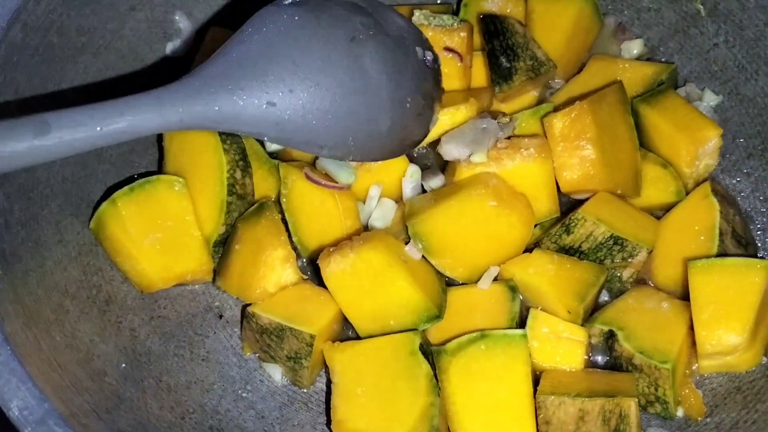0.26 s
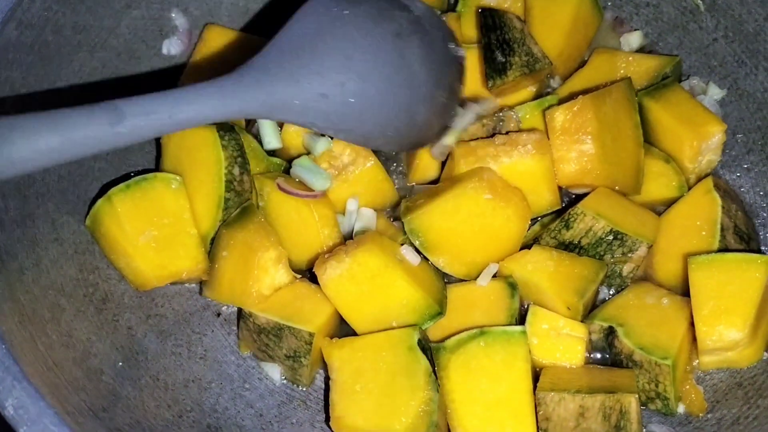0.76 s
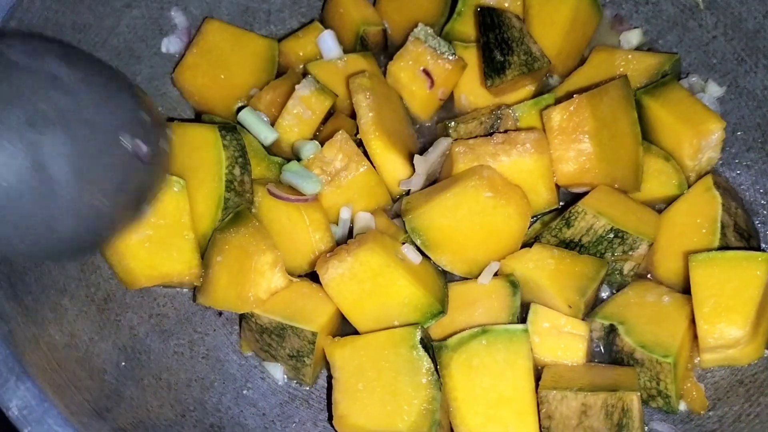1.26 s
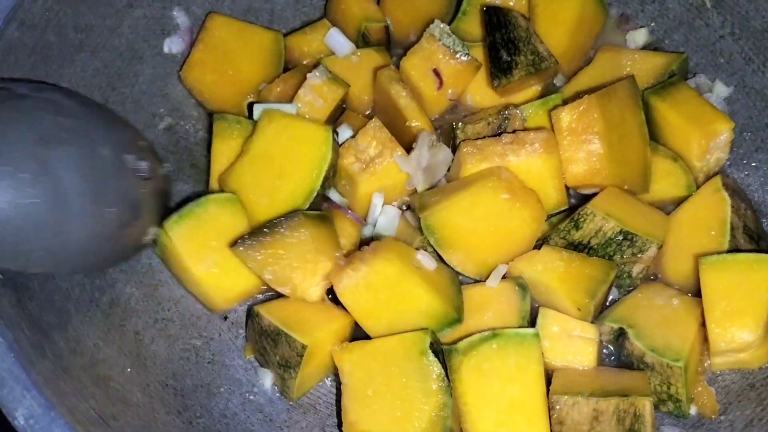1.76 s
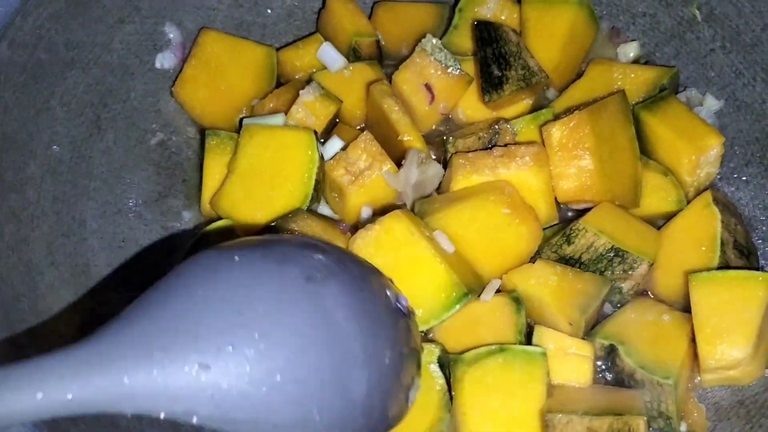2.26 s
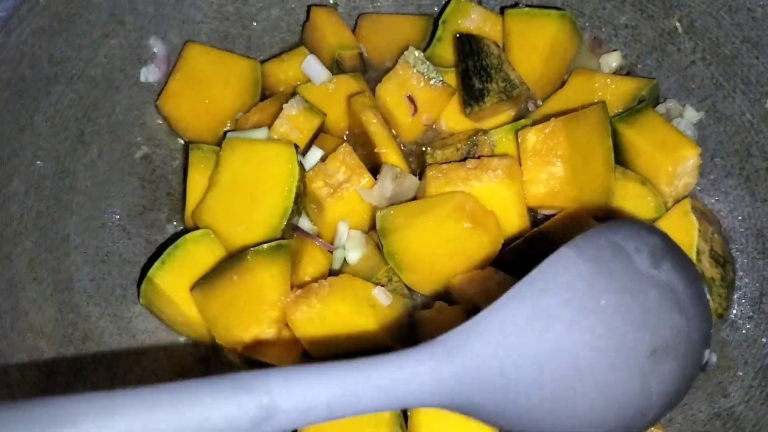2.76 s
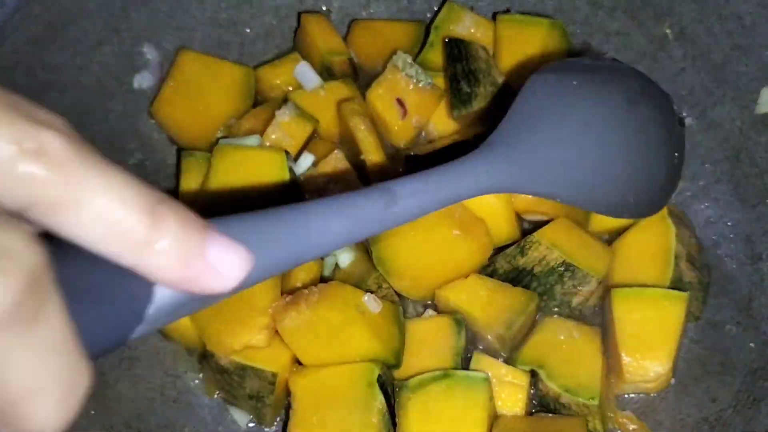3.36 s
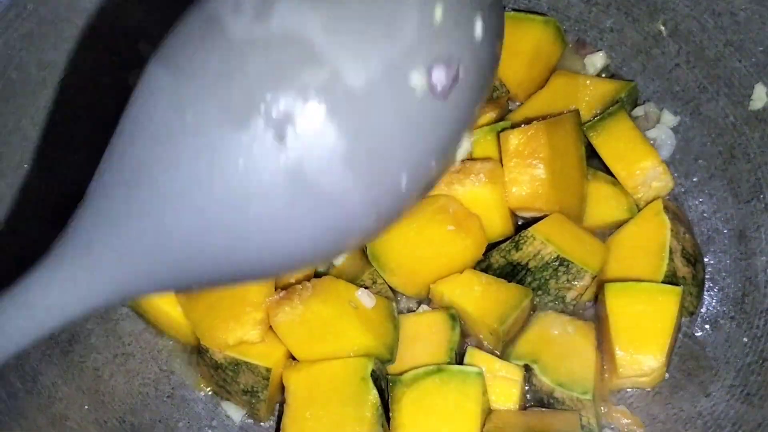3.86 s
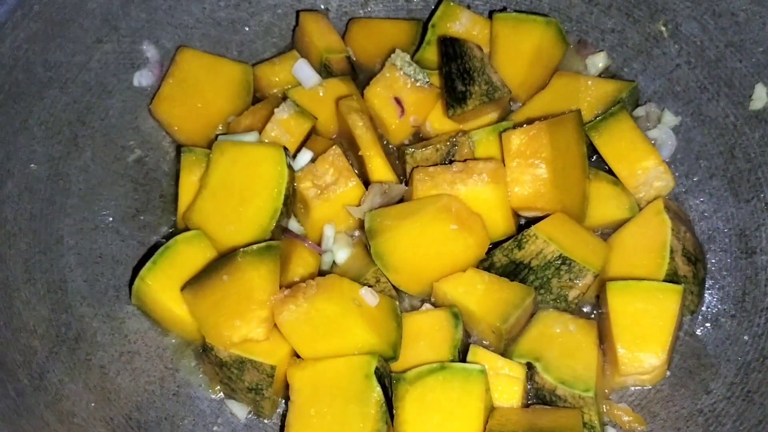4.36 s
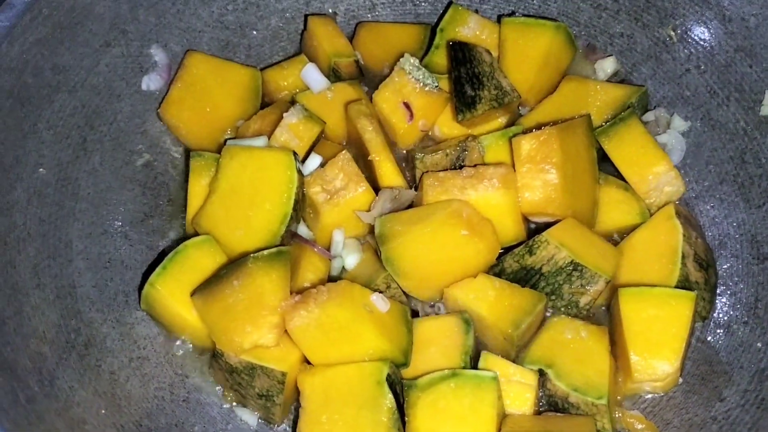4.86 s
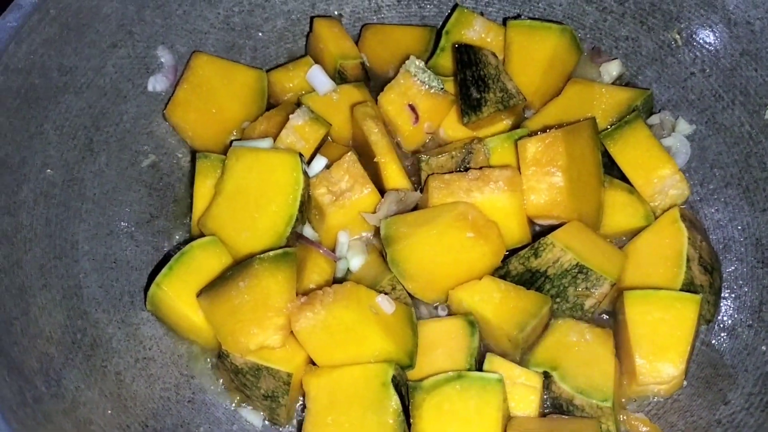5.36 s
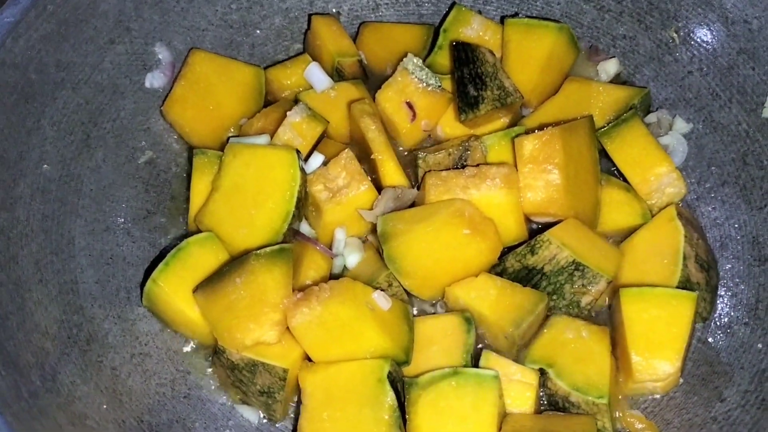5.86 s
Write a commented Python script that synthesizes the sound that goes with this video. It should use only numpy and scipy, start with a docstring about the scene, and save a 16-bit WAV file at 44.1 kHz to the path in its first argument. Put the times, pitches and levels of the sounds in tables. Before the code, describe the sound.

One rooster crow dominates: rough, stepping upward, sustained for about two seconds, then drooping, heard from outside with brief yard reflections. Near the microphone, soft bassy thumps come at the start, middle and end. A ladle swishes faintly and knocks a food-filled wok just after the crow. Beneath lie a barely audible sizzle, a thin electrical hum, a low distant drone and weak far-off bird calls.

```python
"""Rooster outside a kitchen

A rooster crows once in the yard: a hoarse start, a long held note, a falling end. It is built from
sliding overtones, rough growl and breath noise, with lower notes from a second voice and yard echoes.
Indoors a plastic ladle nudges pumpkin pieces in a wok: shaped noise makes light scrapes and a faint
sizzle, fading tones make one knock. Moving air and handling thump on the close microphone as rumble
and short swings. A motor hums in sine waves; a far bird and a low drone are narrow bands of noise."""
import sys
import numpy as np
from scipy import signal
from scipy.fft import rfft, irfft
from scipy.io import wavfile
from scipy.ndimage import uniform_filter1d

SR = 44100
rng = np.random.default_rng(int(sys.argv[2]) if len(sys.argv) > 2 else 0)


def store_pcm(level_fs):
    """Save levels as 16-bit WAV."""
    pcm = np.round(np.clip(level_fs, -1, 1) * 32767).astype(np.int16)
    wavfile.write(sys.argv[1], SR, np.atleast_2d(pcm).T)


N = 270333   # length in samples

CROW_START_S, CROW_END_S = 1.33, 3.345


def rooster():
    """Two voices of one bird sound together, inside a shared fade in and fade out."""
    t = seconds()
    fade_in = np.clip((t - CROW_START_S) / 0.0065, 0, 1)
    fade_out = np.clip((CROW_END_S - t) / 0.14, 0, 1)
    return fade_in * fade_out * (first_voice() + second_voice())


# The crow steps up, arches and sinks. Each row: time in seconds, pitch in Hz.
CROW_PITCH = [(1.36, 835), (1.44, 835.5), (1.55, 813.6), (1.58, 906.5), (1.63, 917), (1.72, 892.4),
              (1.83, 924.8), (1.96, 943.8), (2.1, 922.6), (2.22, 916.4), (2.46, 893.7), (2.56, 905.2),
              (2.72, 901.7), (2.95, 852.4), (3.1, 825.3), (3.22, 769.8), (3.3, 775)]
# How hard the bird pushes. Each row: time in seconds, effort in dB before the offsets below.
CROW_EFFORT = [(1.36, -38), (1.42, -34.5), (1.62, -33.5), (1.69, -38.5), (1.85, -29), (1.97, -30),
               (2.02, -33), (2.15, -29.5), (2.38, -31), (2.5, -32.5), (2.57, -28.5), (2.65, -28.5),
               (2.76, -33), (2.92, -42), (3.18, -40), (3.3, -38.5)]
# How the beak opens. Each row: time in seconds, frequency in Hz that sets the moving resonances.
BEAK_OPENING = [(1.35, 3560), (1.95, 3628), (2.47, 3556), (2.58, 3860), (2.87, 4214), (3.3, 4210)]
VOICE_DB = 1   # strong overtones, relative to effort


def first_voice(flutter=0.00211, entry_s=1.351, tension_s=0.031):
    """The syrinx (the bird's voice organ) gives a stack of overtones; when pressed it grows rough."""
    pitch = uniform_filter1d(in_time(CROW_PITCH)[0], int(tension_s * SR))   # muscle tension cannot jump
    effort_db, = in_time(CROW_EFFORT)
    opening_hz, = in_time(BEAK_OPENING)
    jitter, growl_gain, rasp_gain = hoarseness(effort_db)
    unsteady_pitch = pitch * (1 + jitter * drift(107.5) + flutter * drift(43.2))
    phase = 2 * np.pi * np.cumsum(unsteady_pitch) / SR
    voice = from_db(effort_db + VOICE_DB) * strong_partials(phase, pitch, opening_hz)
    voice += beak_tone(phase, pitch)
    voice += growl_gain * growl(phase) + rasp_gain * rasp(phase)
    return voice * np.clip((seconds() - entry_s) / 0.014, 0, 1)


# Spells in which the voice breaks up; they add to the clear values below.
# Each row: start and end in seconds, pitch jitter as a share, half-pitch growl in dB, rasp in dB.
ROUGH_SPELLS = [(1.343, 1.38, 0.0075, -72, -50), (1.464, 1.55, 0.0031, -61, -57),
                (1.57, 1.794, 0.0082, -65, -50.5), (2.055, 2.247, 0.0047, -48, -55.5),
                (2.259, 2.346, 0.0014, -47, -49), (2.475, 2.771, 0.0029, -45.5, -48.5),
                (3.208, 3.299, 0.008, -51, -53)]
CLEAR_JITTER = 0.0033   # share of the pitch
CLEAR_GROWL_DB, CLEAR_RASP_DB = -49, -46   # relative to effort
BREAK_S = 0.016   # time the voice takes to break or clear


def hoarseness(effort_db):
    """Jitter, growl and rasp follow a clear voice and rise in each hoarse spell."""
    jitter = CLEAR_JITTER
    growl_gain = from_db(effort_db + CLEAR_GROWL_DB)
    rasp_gain = from_db(effort_db + CLEAR_RASP_DB)
    for start, end, share, growl_db, rasp_db in ROUGH_SPELLS:
        on = spell(start, end, BREAK_S)
        jitter = jitter + share * on
        growl_gain = growl_gain + from_db(growl_db) * on
        rasp_gain = rasp_gain + from_db(rasp_db) * on
    return jitter, growl_gain, rasp_gain


# Fixed resonances that the five strong overtones slide through. Each row: frequency in Hz, gain in dB.
WINDPIPE_COLOUR = [(780, 6), (825, -14), (900, -7), (930, 0), (1550, -7), (1660, 0), (1900, 1), (2350, -22),
                   (2520, -10), (2710, -14), (2850, -24), (3130, -2), (3320, -6), (3450, -28), (4550, -46),
                   (4680, -27)]
# Two resonances move with the beak and jump up late in the held note.
# Each row: share of the opening frequency, peak gain in dB, width in Hz.
MOVING_RESONANCES = [(0.744, -11.5, 185), (1.002, -5.5, 309)]
# A wide-open beak weakens the lowest partial.
OPENING_HZ, WIDE_OPEN_HZ, OPEN_FUNDAMENTAL_DB = 3650, 3760, -2


def strong_partials(phase, pitch, opening_hz, shimmer=0.23, swell_db=2.5, count=5):
    """The lowest partials trade places as they cross resonances of windpipe and beak; rms about 1."""
    multiples = np.arange(1, count + 1)
    hz = multiples[:, None] * pitch
    gains = at_hz(WINDPIPE_COLOUR, hz)
    for share, db, width in MOVING_RESONANCES:
        offset = 2 * (hz - share * opening_hz) / width
        gains = gains + from_db(db) / (1 + offset ** 2) ** 2
    gains[0] *= from_db(np.interp(opening_hz, [OPENING_HZ, WIDE_OPEN_HZ], [0, OPEN_FUNDAMENTAL_DB]))
    total = 0
    for k, gain in zip(multiples, gains):
        wavering = (1 + shimmer * drift(32)) * from_db(swell_db * np.tanh(drift(12)))
        total = total + gain * np.sin(k * phase) * wavering
    return total / np.sqrt(np.sum(gains ** 2, axis=0) / 2)


# Colour of the higher overtones. Each row: frequency in Hz, gain in dB.
BEAK_COLOUR = [(4500, 4), (5500, -7.5), (5900, -9), (6400, 3), (6950, -21), (7500, 15.5), (8100, -1.5),
               (8350, -25), (9500, -24.5), (11700, -17), (14000, -23), (16000, -25)]
RING_DB = -70.5   # ring while the pitch is relaxed
STRAIN_FROM_HZ, STRAIN_FULL_HZ, STRAIN_DB = 894.7, 919.2, 21.5   # extra ring at full strain
SHEEN_DB, SHEEN_START_S, SHEEN_END_S = -71.5, 1.76, 3.16


def beak_tone(phase, pitch):
    """The beak rings louder as pitch is strained upward; a top sheen sounds through the long note."""
    strain = np.interp(pitch, [STRAIN_FROM_HZ, STRAIN_FULL_HZ], [0, 1])
    ring = from_db(RING_DB + STRAIN_DB * strain) * stack(phase, pitch, np.arange(6, 11), BEAK_COLOUR)
    sheen_gain = from_db(SHEEN_DB) * spell(SHEEN_START_S, SHEEN_END_S, BREAK_S)
    return ring + sheen_gain * stack(phase, pitch, np.arange(11, 20), BEAK_COLOUR)


# Lines halfway between the overtones. Each row: multiple of the pitch, level in dB.
GROWL_LINES = [(1.5, -7.5), (2.5, 0), (3.5, 1.5), (4.5, -19)]


def growl(phase, phase_jitter=0.1):
    """Alternate cycles differ, unsteadily, which puts lines halfway between the partials; rms 1."""
    total = 0
    for k, db in GROWL_LINES:
        line = np.sin(k * phase + phase_jitter * drift(180))
        total = total + from_db(db) * line * (1 + 0.45 * drift(75))
    return rms_one(total)


# Colour of the throat. Each row: frequency in Hz, gain in dB.
THROAT_COLOUR = [(520, -36), (660, -4), (780, -12.5), (950, -15), (1100, -26), (1330, -5.5), (1520, -27),
                 (1800, -2), (2150, -12), (2650, -4), (3250, -2), (3700, -14), (4200, -20.5), (6000, -30)]


def rasp(phase, bursts_db=9.5):
    """Air escapes in a puff each cycle, in uneven bursts, and rings the throat; rms 1."""
    puffs = rng.standard_normal(N) * (1 + np.cos(phase))
    return coloured(puffs * from_db(bursts_db * np.tanh(drift(80))), THROAT_COLOUR)


# The other side of the syrinx adds lower notes at the start and end.
# Each row: start and end in seconds, pitch in Hz before scoop and sag, then levels in dB of
# the first partial, the overtones and the half-pitch growl.
SECOND_VOICE_NOTES = [(1.338, 1.443, 762, -44, -64, -87), (1.483, 1.604, 668, -52.5, -42, -72),
                      (1.60, 1.664, 815, -43, -45, -77), (1.675, 1.771, 812, -43.5, -46, -49),
                      (1.776, 1.864, 799, -49.5, -70, -75), (3.199, 3.333, 728.6, -42, -53.5, -64)]
SCOOP_HZ, SCOOP_S, SAG_HZ_PER_S = 60.2, 0.022, 50   # each note scoops up, and sags as it goes


def second_voice(jitter=0.009, shimmer=0.084, fade_s=0.016):
    """Lower, unsteady notes beat against the first voice and make the crow hoarse."""
    pitch, first, upper, rough = SECOND_VOICE_NOTES[0][2], 0, 0, 0
    for start, end, hz, first_db, upper_db, growl_db in SECOND_VOICE_NOTES:
        age = np.maximum(seconds() - start, 0)
        on = spell(start, end, fade_s)
        scoop = SCOOP_HZ * np.exp(-age / SCOOP_S)
        sag = SAG_HZ_PER_S * np.minimum(age, end - start)
        pitch = np.where(age > 0, hz - scoop - sag, pitch)
        first = first + from_db(first_db) * on
        upper = upper + from_db(upper_db) * on
        rough = rough + from_db(growl_db) * on
    phase = 2 * np.pi * np.cumsum(pitch * (1 + jitter * drift(92.6))) / SR
    voice = np.sqrt(2) * first * np.sin(phase + 0.5 * drift(46))
    voice += upper * stack(phase, pitch, np.arange(2, 6), THROAT_COLOUR)
    voice += rough * (np.sin(1.5 * phase) + np.sin(2.5 * phase))
    return voice * (1 + shimmer * drift(92))


YARD_T60_S = 0.31   # time for the echoes to fall by 60 dB
YARD_DB, DIRECT_DB = -1.5, -4   # echoes and direct sound


def yard(x, first_echo_s=0.012):
    """Walls return a dense tail of echoes, made here of fading noise."""
    t = np.arange(SR) / SR
    echoes = rng.standard_normal(SR) * from_db(-60 * t / YARD_T60_S) * (t > first_echo_s)
    tail = signal.fftconvolve(x, echoes / np.linalg.norm(echoes))[:N]
    return from_db(DIRECT_DB) * x + from_db(YARD_DB) * tail


# Touches of the ladle. Each row: peak time in seconds, level in dB, rise and decay in seconds,
# then the shares in dB of dull wok body and of wet swish.
LADLE_TOUCHES = [(1.469, -46.5, 0.0059, 0.0083, -30, 2), (1.485, -61, .008, 0.058, -26, 3.5),
                 (2.485, -53, 0.0024, 0.029, -6, -7), (3.416, -45, 0.0019, 0.048, -1.5, -13),
                 (5.13, -68, 0.016, 0.022, 5, -15)]
# Colour of the wok body. Each row: frequency in Hz, gain in dB.
WOK_COLOUR = [(300, -7), (700, -1.5), (1200, -1.5), (2000, -11), (3000, -24), (3950, -4), (4600, -10),
              (5800, -2), (7000, -7.5), (8500, -29), (12000, -27.5), (16000, -27)]
# Colour of the wet swish. Each row: frequency in Hz, gain in dB.
SWISH_COLOUR = [(4000, -28), (5400, -6.5), (6900, 8), (8500, -14.5), (10000, -12), (12000, -1), (15000, 0),
                (16000, -10)]


def ladle(grain_db=1.0):
    """Each touch is a rush of tiny slips: the food-damped wok answers dully, the wet surface swishes."""
    body, swish = noise(WOK_COLOUR), noise(SWISH_COLOUR)
    touches = 0
    for s, db, rise, decay, body_db, swish_db in LADLE_TOUCHES:
        mix = from_db(body_db) * body + from_db(swish_db) * swish
        touches = touches + stroke(s, rise, decay) * from_db(db) * mix
    return touches * from_db(grain_db * drift(300))


# Ringing tones of the wok. Each row: frequency in Hz, level in dB relative to the knock,
# time in seconds to fall by 60 dB.
WOK_TONES = [(640, -5, .14), (770, 8.5, 0.068), (1034, -2, 0.091), (1228, -15, .13), (1810, -13, 0.16),
             (3900, -8, .13), (5640, -10, 0.18), (6300, -16, .1), (7050, -14, 0.15)]
KNOCK_S, KNOCK_DB, CRACK_DB = 3.4095, -46.5, -53


def knock(crack_decay_s=0.008):
    """The ladle knocks the wok wall: a brief crack sets it ringing; the food damps it quickly."""
    age = np.maximum(seconds() - KNOCK_S, 0)
    ring = 0
    for hz, db, t60 in WOK_TONES:
        fading = from_db(np.maximum(db - 60 * age / t60, -200))
        ring = ring + fading * np.sin(2 * np.pi * hz * age)
    crack = stroke(KNOCK_S, 0.0003, crack_decay_s) * noise(WOK_COLOUR)
    return from_db(KNOCK_DB) * ring + from_db(CRACK_DB) * crack


# Spells of hiss, added to the resting hiss. Each row: start and end in seconds, level in dB.
HISS_SPELLS = [(1.15, 4.0, -81), (5.12, 5.72, -87)]
# Colour of the hiss. Each row: frequency in Hz, gain in dB.
HISS_COLOUR = [(5000, -16.5), (7000, 8.5), (9500, -15), (11700, 0), (12800, -4), (15500, 2)]
# Spits of juice on hot metal. Each row: peak time in seconds, level in dB, rise and decay in seconds.
JUICE_SPITS = [(4.205, -64, 0.043, 0.039), (4.218, -59.5, 0.0036, .006)]
# Colour of the spits. Each row: frequency in Hz, gain in dB.
SPIT_COLOUR = [(5000, -30), (7200, -7.5), (9000, -27), (12000, -11), (15000, -3), (16000, -2)]
HISS_REST_DB, HISS_FADE_S = -85, 0.1


def sizzle(grain_db=2.0):
    """Juice hisses faintly on the metal and spits now and then."""
    hiss = from_db(HISS_REST_DB)
    for start, end, db in HISS_SPELLS:
        hiss = hiss + from_db(db) * spell(start, end, HISS_FADE_S)
    both = swells(JUICE_SPITS) * noise(SPIT_COLOUR) + hiss * noise(HISS_COLOUR)
    return both * from_db(grain_db * drift(250))


# Gusts of air at the microphone.
# Each row: peak time in seconds, level in dB, rise and decay in seconds.
AIR_GUSTS = [(.14, -29, 0.032, 0.11), (.97, -44, 0.096, .3), (1.92, -42, 0.046, 0.065),
             (2.22, -46, 0.054, 0.086), (2.52, -46.5, 0.053, .1), (2.82, -46, 0.066, 0.094),
             (3.62, -47, 0.21, 0.09), (4.1, -48, 0.15, 0.15), (5.05, -38.5, .065, 0.096),
             (5.82, -51, 0.05, 0.088)]
# Colour of the rumble. Each row: frequency in Hz, gain in dB.
GUST_COLOUR = [(20, -11), (35, -1), (55, 1), (90, -2), (130, -11.5), (200, -21.5), (300, -25.5),
               (500, -44.5)]
# The strongest thumps. Each row: time in seconds, level of the main swing in dB, frequency in Hz.
MICROPHONE_THUMPS = [(.110, -18, 89.5), (0.147, -22.5, 61), (0.169, -16, 140), (0.264, -28, 109),
                     (0.324, -34.5, 137), (0.489, -32.5, 111), (.899, -35.5, 108), (0.942, -26.5, 86),
                     (0.969, -39.5, 148), (1.028, -31.5, 93), (1.097, -31.5, 97), (1.271, -39.5, 88.5),
                     (1.52, -42, 96.5), (1.943, -26, 117), (1.982, -26.5, 63), (2.248, -36, 75),
                     (2.538, -37, 97.4), (2.795, -31.5, 106), (2.82, -23, 72), (3.631, -25.5, 68.6),
                     (3.718, -19, 78), (3.735, -23, 79), (3.975, -29.5, 58), (5.021, -17, 97),
                     (5.039, -19.5, 80), (5.177, -32.5, 56.6), (5.808, -39, 86), (5.88, -38.5, 66)]
CALM_DB = -59   # rumble between gusts
SNAP_DB, SNAP_RATIO = -18.5, 2.13   # a faster swing sharpens each thump: level and speed relative to it


def buffeting(cycles=0.5, lumpy_db=3.0):
    """Each thump pushes the diaphragm through one swing and back, over the lumpy rumble of gusts."""
    lumps = from_db(lumpy_db * np.tanh(drift(4)))
    out = (from_db(CALM_DB) + swells(AIR_GUSTS)) * lumps * noise(GUST_COLOUR)
    for s, db, hz in MICROPHONE_THUMPS:
        turns = (seconds() - s) * hz
        near = np.abs(turns) < 3
        snap = from_db(SNAP_DB) * swing(SNAP_RATIO * turns[near], cycles)
        out[near] -= from_db(db) * (swing(turns[near], cycles) + snap)
    return out


# Tones of the motor hum. Each row: whole multiple of the motor frequency, rms level in dB.
MOTOR_TONES = [(2, -72.5), (3, -77), (5, -73), (6, -75.5), (7, -77), (9, -74.5), (10, -80), (11, -75.5),
               (12, -69.5), (13, -85), (15, -77), (21, -81), (25, -84.5), (33, -81.5), (35, -80.5),
               (37, -82.5)]
# Colour of the room air. Each row: frequency in Hz, gain in dB.
AIR_COLOUR = [(110, -41.5), (180, -1), (201, -18), (243, -12.5), (316, -7), (533, -8), (564, -6),
              (596, -10), (760, -11.5), (1460, -9.5), (1640, -12.5), (4090, -17), (7310, -25.5),
              (9330, -43), (15800, -49.5)]
MOTOR_HZ, AIR_DB = 119.7, -63.36


def kitchen(waver=0.013):
    """Steady room air, and a motor buzz of sine waves that waver together."""
    turns = MOTOR_HZ * seconds() + waver * drift(2.93)
    hum = 0
    for k, db in MOTOR_TONES:
        hum = hum + np.sqrt(2) * from_db(db) * np.sin(2 * np.pi * (k * turns + rng.random()))
    return hum + from_db(AIR_DB) * noise(AIR_COLOUR)


# A bird far away. Each row: peak time in seconds, level in dB, rise and decay in seconds.
FAR_BIRD_CALLS = [(3.529, -66, 0.036, 0.057), (3.88, -69, 0.12, .15), (4.47, -66.5, .09, 0.1),
                  (5.22, -71.5, .06, 0.057), (5.62, -73, .12, .12)]
FAR_HZ, FAR_WIDTH_HZ = 2570, 160
DRONE_HZ, DRONE_WIDTH_HZ = 256, 43.4
# The drone outside swells once and fades.
DRONE_PEAK_S, DRONE_RISE_S, DRONE_DECAY_S = 2.45, 1, 0.29
DRONE_SWELL_DB, DRONE_REST_DB = -58.5, -79   # the swell adds to the resting level


def distance():
    """Faint calls of a far bird and a low drone, blurred on their way into narrow bands of noise."""
    swell = from_db(DRONE_SWELL_DB) * stroke(DRONE_PEAK_S, DRONE_RISE_S, DRONE_DECAY_S)
    drone = (from_db(DRONE_REST_DB) + swell) * narrow_noise(DRONE_HZ, DRONE_WIDTH_HZ)
    return swells(FAR_BIRD_CALLS) * narrow_noise(FAR_HZ, FAR_WIDTH_HZ) + drone


def from_db(db):
    """Decibels to gain."""
    return 10 ** (np.asarray(db) / 20)


def rms_one(x):
    """Scale to rms 1 (rms is the average strength)."""
    return x / np.sqrt(np.mean(x ** 2) + 1e-20)


def seconds():
    """Time of every sample."""
    return np.arange(N) / SR


def in_time(rows):
    """Each column of a curve, sample by sample."""
    s, *columns = np.transpose(rows)
    return [np.interp(seconds(), s, c) for c in columns]


def at_hz(points, hz):
    """Gain of a spectrum at given frequencies."""
    f, db = np.transpose(points)
    return from_db(np.interp(np.log(hz + 1), np.log(f), db))


def stack(phase, pitch, multiples, spectrum, uneven_db=6.0):
    """Partials slide through fixed resonances, each wavering by itself; total rms about 1 throughout."""
    gains = np.array([at_hz(spectrum, k * pitch) * from_db(uneven_db * drift(27)) for k in multiples])
    total = sum(g * np.sin(k * phase) for k, g in zip(multiples, gains))
    return total / np.sqrt(np.sum(gains ** 2, axis=0) / 2)


def coloured(x, spectrum):
    """Give a sound a colour that falls away beyond its ends; rms 1."""
    hz = np.fft.rfftfreq(N, 1 / SR) + 1
    low_end = 1 / (1 + (spectrum[0][0] / hz) ** 8)
    high_end = 1 / (1 + (hz / spectrum[-1][0]) ** 60)
    return rms_one(irfft(rfft(x) * at_hz(spectrum, hz) * low_end * high_end, N))


def noise(spectrum):
    """Noise of a given colour; rms 1."""
    return coloured(rng.standard_normal(N), spectrum)


def narrow_noise(hz, width_hz):
    """Noise in one narrow band; rms 1."""
    edges = [hz - width_hz / 2, hz + width_hz / 2]
    band = signal.butter(2, edges, "band", fs=SR, output="sos")
    return rms_one(signal.sosfilt(band, rng.standard_normal(N)))


def drift(rate_hz):
    """Random wander, mostly slower than a given rate, drawn at every tenth sample; rms about 1."""
    smooth = signal.butter(2, rate_hz, fs=SR / 10, output="sos")
    slow = signal.sosfilt(smooth, rng.standard_normal((N + SR) // 10 + 1))[SR // 10:]   # skip the start-up
    return np.interp(np.arange(N) / 10, np.arange(len(slow)), rms_one(slow))


def stroke(s, rise, decay):
    """Envelope that swells to 1 at s and dies away."""
    t = seconds() - s
    return np.exp(np.maximum(np.minimum(t / rise, -t / decay), -40))


def swells(rows):
    """Summed envelope of events given as peak time (s), level (dB), rise (s) and decay (s)."""
    return sum(from_db(db) * stroke(s, rise, decay) for s, db, rise, decay in rows)


def spell(start, end, fade):
    """Envelope that fades in around start, holds at 1 and fades out around end."""
    t = seconds()
    return np.clip(np.minimum(t - start, end - t) / fade + 0.5, 0, 1)


def swing(turns, cycles):
    """A cosine that lasts about the given number of cycles each way."""
    return np.cos(2 * np.pi * turns) * np.exp(-(turns / cycles) ** 2)


def scene():
    """All sources at one microphone."""
    crow = yard(rooster())
    wok = ladle() + knock() + sizzle()
    return (crow + wok + buffeting() + kitchen() + distance())[None]


CUTOFF_HZ = 15850


def record(dry):
    """The top is cut steeply."""
    low_pass = signal.ellip(10, 0.2, 80, CUTOFF_HZ, fs=SR, output="sos")
    return signal.sosfilt(low_pass, dry)


dry = scene()
out = record(dry)
store_pcm(out)
```